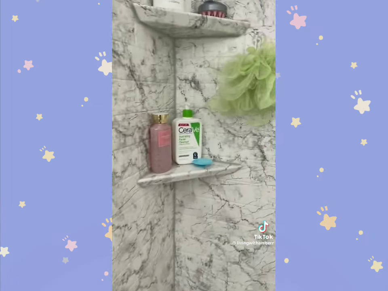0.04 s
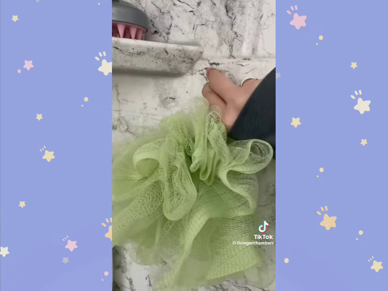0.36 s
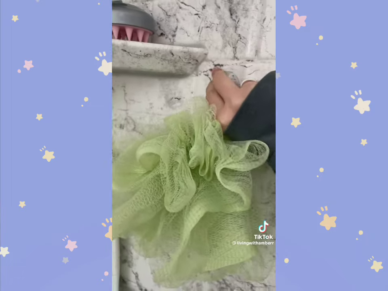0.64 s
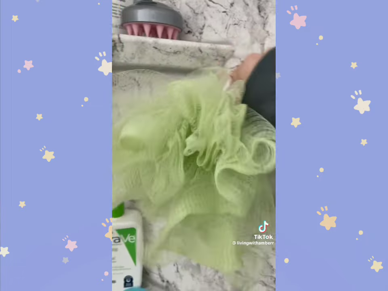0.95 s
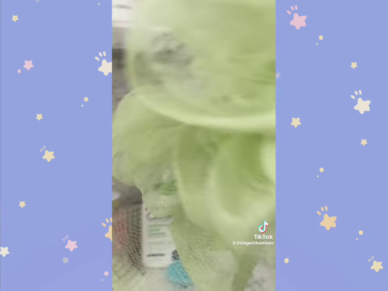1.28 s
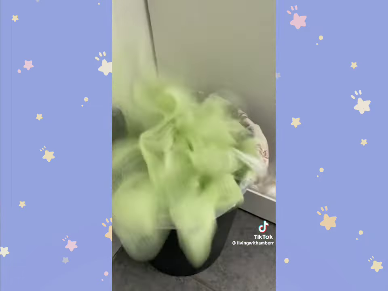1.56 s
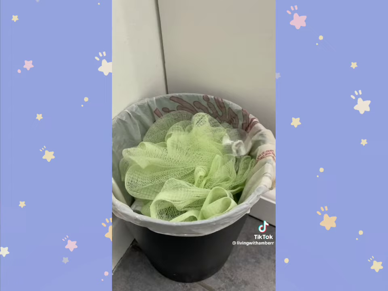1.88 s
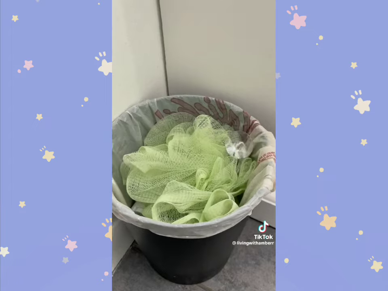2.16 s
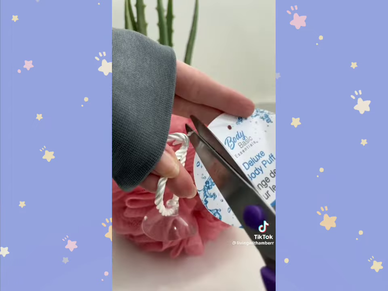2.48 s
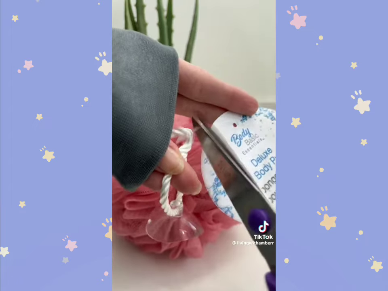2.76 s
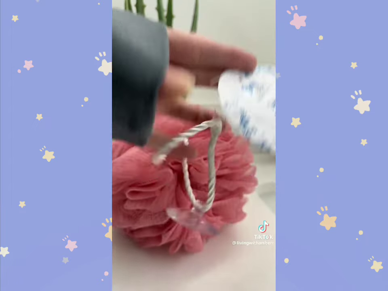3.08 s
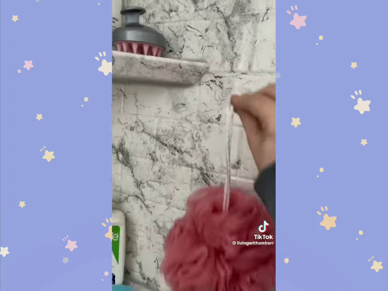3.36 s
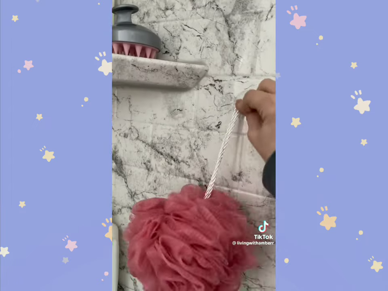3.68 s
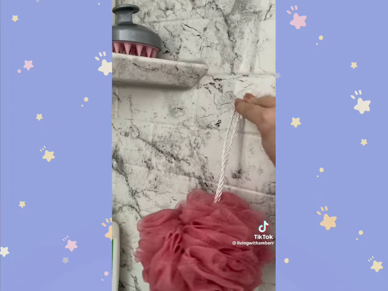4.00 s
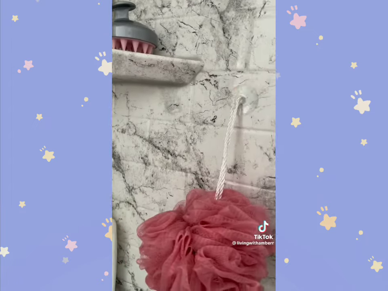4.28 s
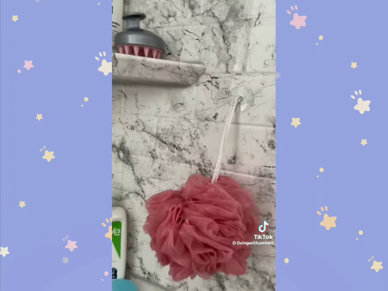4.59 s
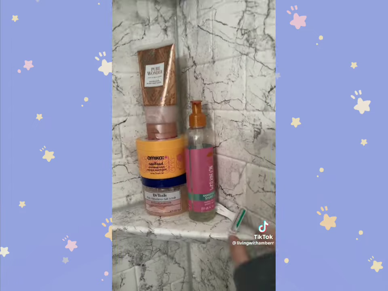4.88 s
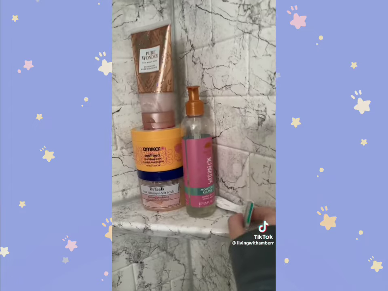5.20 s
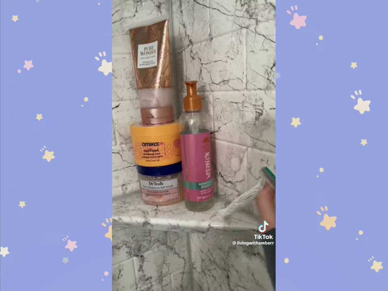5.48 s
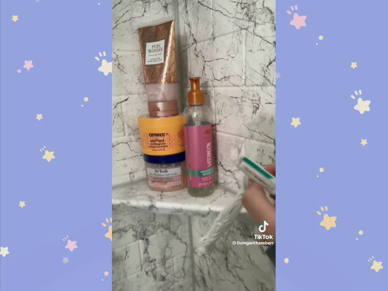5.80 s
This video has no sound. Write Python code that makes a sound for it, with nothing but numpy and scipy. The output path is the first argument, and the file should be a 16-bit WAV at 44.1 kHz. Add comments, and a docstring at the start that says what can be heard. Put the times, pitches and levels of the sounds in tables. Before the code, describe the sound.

Close bathroom handling: netting drops into a bin with a rustling thump, then a crisp scissor snip, hollow knocks and a light plastic scrape.

```python
"""Bath things are swapped close to a phone, over a low room rumble.
After a short hiss, a mesh sponge comes off its wall hook and drops into a lined bin (1.5 s), which
rustles and booms. Scissors crunch through the tag of a new one (2.8 s). Its cord is hung up with
knocks on the hollow wall panel (3.5 s); a brief tone swells into the first. Last, a razor taps a
shelf (5.1 s) and slides off, its handle ringing lower as it goes."""
import sys
import numpy as np
from scipy import signal
from scipy.fft import rfft, irfft, next_fast_len
from scipy.io import wavfile
from scipy.ndimage import uniform_filter1d

SR = 44100
rng = np.random.default_rng(int(sys.argv[2]) if len(sys.argv) > 2 else 0)


def log_audio(samples):
    """Write samples as a 16-bit WAV file to the path given in sys.argv[1]."""
    # one column per channel
    frames = np.atleast_2d(samples).T
    # limit to full scale, then quantise
    limited = np.clip(frames, -1, 1)
    pcm = np.round(limited * 32767).astype(np.int16)
    wavfile.write(sys.argv[1], SR, pcm)


N = 257544
TIME_S = np.arange(N) / SR
EDGE_HZ = 15700

# Sponge brushing the rim, sliding, landing, settling. Each row: start in seconds, hold in seconds,
# level in dB.
LINER_SLIDES = [(1.519, 0.05, -36), (1.576, 0.067, -24.5), (1.666, 0.032, -34.5), (1.751, 0.0079, -34),
                (1.77, 0.015, -39.5), (1.813, 0.025, -42.5), (1.919, 0.021, -59)]
# Netting on the liner. Each row: frequency in Hz, relative level in dB.
MESH_COLOUR = [(100, -8.5), (450, -7), (900, -16.5), (1400, -22.5), (1800, -16), (2900, -14.5),
               (4400, -14.5), (6000, -6), (7500, -7), (9000, -7), (11000, 1.5), (12300, -3.5),
               (13200, -9.5), (14000, -33.5), (15500, -46)]
# Narrow resonances of the lined bin. Each row: frequency in Hz, width in Hz, gain in dB.
BIN_RESONANCES = [(580.3, 35, 3), (1293, 61, 2), (1699, 36, -0.5), (2010, 70, 2), (2860, 130, -3.5),
                  (3700, 110, -0.5), (4320, 92, -1.5), (6590, 67, -2.5), (7200, 98, -1.5), (10750, 100, -7)]


def sponge_drop(boom_hz=170):
    """Netting slips down the liner; the rustle rings in the bin and the hollow booms along."""
    slide = sum(amp(db) * held(s, s + hold, 0.0087, 0.02) for s, hold, db in LINER_SLIDES)
    threads = grains(spread_db=-1, pan=0.53, per_band=14000) * slide
    rustle = colour(threads + amp(-7) * liner_folds(slide), tilted(MESH_COLOUR, 0.96))
    ringing = sum(amp(db) * signal.lfilter(*signal.iirpeak(hz, hz / width, fs=SR), rustle)
                  for hz, width, db in BIN_RESONANCES)
    hollow = amp(-13) * boom(boom_hz, width=0.19) * slide
    return placed(rustle + ringing + hollow, room_db=-4.5)


def liner_folds(slide, pops_per_s=340, decay_cycles=18, spread_db=6, pitches=24):
    """Small folds pop at random under the sliding sponge, each ringing briefly."""
    t, out = np.arange(SR // 30) / SR, np.zeros(N)
    for hz in np.geomspace(1100, 12000, pitches) * rng.uniform(0.95, 1.05, pitches):
        popped = rng.random(N) < pops_per_s / pitches / SR
        strength = amp(spread_db * np.minimum(rng.exponential(1, N), 3))
        ring = np.exp(-t * hz / decay_cycles) * np.sin(2 * np.pi * hz * t)
        out += signal.oaconvolve(unit(popped * strength) * slide, ring / np.linalg.norm(ring))[:N]
    return out / np.sqrt(pitches)


# Liner creases. Each row: start in seconds, decay in seconds, level in dB, pitch in Hz.
CRINKLES = [(1.5, 0.0012, -44.5, 1350), (1.5, 0.0018, -44, 2300), (1.519, 0.0025, -45, 1290),
            (1.574, 0.0023, -44.5, 1100), (1.577, 0.0012, -25.5, 6200), (1.638, 0.015, -22.5, 10750),
            (1.743, 0.0033, -46.5, 1800), (1.758, 0.0024, -39.5, 1900), (1.761, .001, -32, 7000),
            (1.766, 0.0013, -35.5, 4400), (1.779, 0.0029, -31, 11200), (1.982, 0.00078, -33, 6800)]


def liner_crinkles():
    """Larger creases give way one by one, each a short burst around one pitch."""
    t, out = np.arange(SR // 10) / SR, np.zeros(N)
    for s, decay, db, hz in CRINKLES:
        burst = resonant_noise(np.full(len(t), hz), width_hz=0.2 * hz)
        add(out, s, amp(db) * burst * pulse(t, decay))
    return placed(out, room_db=-15)


# Bin modes. Each row: frequency in Hz, level in dB, T60 in seconds.
BIN_MODES = [(180, -15.5, 0.11), (343, -21, 0.1), (629, 4, 0.028), (960, -10.5, .04), (1290, -4.5, .05),
             (1640, -0.5, .04), (1920, 2, .04)]
# Sponge landing. Each row: start in seconds, level in dB, contact time in seconds.
BIN_BLOWS = [(1.7712, -4.5, 0.00048)]


def bin_landing(peak_s=1.7696, lead_s=0.0041, end_hz=573, sweep_hz=4976, fall_s=0.0034):
    """The thin bin wall rings and bends; short waves arrive first, so the thump swoops down."""
    t, chirp = np.arange(SR // 20) / SR, np.zeros(N)
    pitch = end_hz + sweep_hz * np.exp(-(t / fall_s) ** 2)
    add(chirp, peak_s - lead_s, np.sin(phase(pitch)))
    flex = amp(-11) * chirp * held(peak_s, peak_s, 0.00037, 0.0017)
    return struck(BIN_MODES, BIN_BLOWS, room_db=-16) + placed(flex, room_db=-13.5)


# Short bright hisses. Each row: peak in seconds, length in seconds, level in dB.
BRIGHT_HISSES = [(0.258, 0.04, -59), (0.613, 0.032, -59.5), (0.79, 0.058, -50), (0.936, 0.036, -51),
                 (0.97, 0.05, -64.5), (1.078, 0.066, -59.5), (1.379, 0.015, -55), (1.421, 0.032, -53.5),
                 (2.693, .014, -58.5), (2.825, 0.053, -42), (2.985, 0.03, -43.5), (3.158, 0.05, -61),
                 (3.199, 0.0084, -40.5), (3.471, 0.031, -40), (3.969, 0.038, -58), (4.9, 0.074, -69.5),
                 (5.107, 0.098, -66), (5.34, 0.14, -58.5)]
# Steady scratching of netting and sleeve. Each row: start in seconds, end in seconds, level in dB.
GRIPS = [(0.226, 0.636, -73), (0.51, 0.532, -73), (1.056, 1.149, -66), (4.304, 4.368, -79.5),
         (4.62, 4.658, -82), (4.854, 5.02, -76)]
# Bright hiss and scratch spectra. Each row: frequency in Hz, relative level in dB.
BRIGHT_COLOUR = [(100, -0.5), (400, -2), (900, -13), (1800, -9), (3200, -10.5), (4700, -14.5), (6500, -2),
                 (9000, -8.5), (11200, 2.5), (12300, -8), (13500, -29)]
GRIP_COLOUR = [(300, 1), (1000, -14), (2000, -3), (3800, -2.5), (6500, 1.5), (9000, 3.5), (11200, -1),
               (13500, -26)]


def hisses_and_scratches():
    """Light mesh brushes, fizz around the snip, click and knock, and faint scratching of the grip."""
    swells = sum(swell(*row, lead=0.49) for row in BRIGHT_HISSES)
    hiss = colour(grains(spread_db=1, per_band=14000) * swells, BRIGHT_COLOUR)
    grip = sum(amp(db) * held(start, end, 0.005, 0.005) for start, end, db in GRIPS)
    scratch = colour(grains(spread_db=-1.5, per_band=5000) * grip, GRIP_COLOUR)
    return placed(hiss + scratch, room_db=-12)


# Scissor snaps. Each row: start in seconds, level in dB, decay in seconds.
SNAPS = [(2.7926, -19, .0004), (2.801, -14, 0.0007), (2.8026, -12.5, 0.00066), (3.1979, -26, 0.0008),
         (3.2072, -40, .0005), (3.2132, -39, 0.0006)]
# Crunch and snap spectra. Each row: frequency in Hz, relative level in dB.
CUT_COLOUR = [(200, -3), (800, -12.5), (1400, -17), (3000, -11), (4300, -20.5), (5600, -7), (7600, 2.5),
              (9000, 2.5), (11200, 4.5), (12500, -10.5), (13500, -25.5), (15500, -21)]
SNAP_COLOUR = [(200, -8), (900, -12), (2000, -6.5), (3800, -9), (4700, -17), (5800, -0.5), (7400, 0),
               (9000, -2.5), (11200, 4), (12500, -10.5), (13500, -19.5), (15500, -14)]
# Tag and blade modes. Each row: frequency in Hz, level in dB, T60 in seconds.
TAG_MODES = [(100, -2.5, 0.023), (202.6, -1.5, 0.026), (488, -9, 0.029)]
BLADE_MODES = [(6560, -2.5, .12), (7400, -0.5, .05), (8890, -2, .12), (8750, -2, .09), (9970, -1, .12),
               (10600, 4.5, 0.094), (11120, -0.5, .13), (12260, -2.5, 0.13)]
# Blows at the cut. Each row: start in seconds, level in dB, contact time in seconds.
TAG_BLOWS = [(2.8046, -10.5, 0.00012)]
BLADE_BLOWS = [(2.8025, -43, 0.0000099)]


def scissors(bite_s=2.788, cut_s=2.805, cut_db=-17.5, squeeze_db_per_s=399.5):
    """Fibres crunch ever louder until the blades snap through and ring; later they click again."""
    bite = held(bite_s, cut_s, 0.006, 0.0061)
    squeeze = amp(cut_db + squeeze_db_per_s * np.minimum(TIME_S - cut_s, 0))
    crunch = grains(spread_db=-4, per_band=20000) * bite * squeeze
    t, snaps = np.arange(SR // 50) / SR, np.zeros(N)
    for s, db, decay in SNAPS:
        add(snaps, s, amp(db) * pulse(t, decay) * rng.choice([-1, 1], len(t)))
    return (placed(colour(crunch, CUT_COLOUR), room_db=-15)
            + placed(colour(snaps, SNAP_COLOUR), room_db=-26.5)
            + struck(TAG_MODES, TAG_BLOWS, room_db=-32)
            + struck(BLADE_MODES, BLADE_BLOWS, room_db=-18))


# Wall panel modes. Each row: frequency in Hz, level in dB, T60 in seconds.
WALL_MODES = [(83.1, -24.5, 0.323), (140, -31, 0.15), (169.5, -16.5, 0.2), (230.7, -21.5, 0.22),
              (311.3, -10, 0.1), (427, -10, 0.071), (566, -17, 0.21), (591, -8, 0.072), (712, -14.5, 0.073),
              (943, -22.5, 0.11), (1000, 15, 0.0052), (1212, -16, 0.078), (1440, 7.5, 0.01),
              (1427, -11.5, 0.088), (1529, -28, 0.062), (2690, -13, 0.0071), (5760, -10.5, 0.006)]
# Knocks on the panel. Each row: start in seconds, level in dB, contact time in seconds.
WALL_BLOWS = [(3.4697, -12.5, 0.000018), (3.4757, -25.5, 0.0003), (3.483, -22.5, 0.00032),
              (3.876, -15, 0.00047), (3.9754, -14.5, 0.00037), (3.988, -18.5, 0.0004),
              (4.002, -16, 0.00056), (4.121, -38, 0.00012)]


def wall_knocks():
    """The hollow panel rings as the cord is hung up."""
    return struck(WALL_MODES, WALL_BLOWS, room_db=-7)


def tone_before_knock(start_s=3.46, hold_s=0.014, hz=1450, jitter=0.049, level_db=-27.5):
    """A brief, nearly pure tone swells into the first knock."""
    envelope = held(start_s, start_s + hold_s, 0.0038, 0.0032)
    pitch = hz * (1 + jitter * wobble(samples=200))
    return placed(amp(level_db) * unit(np.sin(phase(pitch))) * envelope, room_db=-15.5)


# Modes of the ringing taps. Each row: frequency in Hz, level in dB, T60 in seconds.
RINGING_TAP_MODES = [(344, 13, 0.056), (450, -2, 0.04), (833, 13.5, 0.025), (1202, -2.5, 0.0596),
                     (1440, -5, 0.07), (1648, 12.5, 0.023), (1900, 6, 0.034), (2164, 5, 0.031),
                     (2750, -4, 0.04), (3150, 9, 0.018), (4080, -1, 0.021)]
# Blows of hook and razor. Each row: start in seconds, level in dB, contact time in seconds.
RINGING_TAP_BLOWS = [(0.749, -43, 0.00023), (5.125, -46, 0.000036), (5.1897, -50.5, 0.000043),
                     (5.1951, -40.5, 0.00047)]


def ringing_taps():
    """Light ringing taps: first the wall hook, later the razor on the shelf."""
    return struck(RINGING_TAP_MODES, RINGING_TAP_BLOWS, room_db=-6.5)


# Glide of the razor handle. Each row: time in seconds, pitch in Hz, level in dB.
HANDLE_GLIDE = [(5.26, 1854, -56), (5.32, 1680, -49), (5.41, 1519, -51), (5.45, 1242, -50),
                (5.49, 1000, -56.5)]
# Handle modes. Each row: multiple of the pitch, width in Hz, level in dB.
HANDLE_MODES = [(0.521, 400, -4.5), (0.999, 131, -5), (1.4, 250, -16), (2.001, 403, -16.5)]


def razor_handle(ease_s=0.0095, catch_db=2):
    """The sliding handle rings in uneven catches, lower as more of it hangs over the edge."""
    s, hz, db = np.transpose(HANDLE_GLIDE)
    pitch = np.interp(TIME_S, s, hz)
    force = amp(np.interp(TIME_S, s, db)) * held(s[0], s[-1], ease_s, ease_s)
    catches = amp(catch_db * wobble(samples=250))
    ring = sum(amp(mode_db) * resonant_noise(pitch * ratio, width)
               for ratio, width, mode_db in HANDLE_MODES)
    return placed(ring * force * catches, room_db=-11.5)


# Cord, fingers and razor rubbing. Each row: peak in seconds, length in seconds, level in dB.
RUBS = [(0.814, 0.12, -50.5), (2.293, 0.029, -54.5), (2.527, 0.18, -69), (2.698, 0.011, -56),
        (3.616, 0.088, -63.5), (3.684, 0.02, -64.5), (3.978, 0.03, -42), (4.177, 0.022, -60),
        (4.233, 0.028, -71), (4.357, 0.13, -67), (5.15, 0.037, -51), (5.56, 0.027, -54)]
# Rub spectrum. Each row: frequency in Hz, relative level in dB.
RUB_COLOUR = [(100, 4), (400, 7.5), (850, -2.5), (1500, -6.5), (2200, -7.5), (4000, -22.5), (7000, -18),
              (11000, -21.5), (13000, -44)]


def rubs(drag_from_s=5.305, drag_to_s=5.48, drag_db=-52):
    """Fine stick and slip on hard surfaces, and the razor's long drag off the shelf."""
    slips = grains(spread_db=-0.5)
    strokes = colour(slips * sum(swell(*row, lead=0.7) for row in RUBS), RUB_COLOUR)
    pull = amp(drag_db) * held(drag_from_s, drag_to_s, 0.05, 0.0049)
    drag = colour(slips * pull, tilted(RUB_COLOUR, 1.5))
    return placed(strokes, room_db=-6) + placed(drag, room_db=-2.5)


# Hollow scrapes. Each row: peak in seconds, length in seconds, level in dB, pitch in Hz.
SCRAPES = [(0.802, 0.095, -45.5, 524), (0.858, 0.027, -49, 1010), (1.275, 0.26, -76, 1013),
           (2.535, 0.11, -72.5, 1404), (2.852, 0.01, -47, 1360), (3.991, 0.0325, -37, 605.6),
           (5.324, 0.068, -47, 705), (5.452, 0.026, -40.5, 1079)]


def plastic_scrapes(sag_octaves_per_s=4):
    """Friction noise in one resonance that sinks as the contact slows."""
    out = np.zeros(N)
    for s, length, db, hz in SCRAPES:
        pitch = hz * 2 ** np.clip(-sag_octaves_per_s * (TIME_S - s), -0.2, 0.2)
        out += resonant_noise(pitch, width_hz=0.38 * hz) * swell(s, length, db, lead=0.46)
    return placed(out, room_db=-7)


# Ticks and taps. Each row: start in seconds, level in dB, tilt in dB per octave.
TICKS = [(.249, -62, -1), (.624, -68, -1.5), (1.0739, -53.5, 0.5), (1.501, -47, 3.5), (1.944, -55.5, 8),
         (1.9495, -60.5, -0.5), (1.982, -53.5, 5), (2.055, -70, -2), (2.119, -65.5, 4), (2.147, -67, 17),
         (2.970, -64, -1.5), (2.978, -58, -0.5), (3.033, -58, -1.5), (3.118, -62.5, -1.5), (3.931, -78, 2),
         (5.069, -67, 0)]
TAPS = [(.693, -62.5, 1.5), (.7463, -45.5, 4.5), (.7943, -51.5, 3), (.8148, -45, -1.5), (2.2842, -57, 3.5),
        (2.3455, -57, 1), (2.6895, -58, 3), (2.7005, -60, 5), (3.4638, -40, 3.5), (3.4696, -33.5, 2.5),
        (3.874, -64, 10), (4.1215, -50, -0.5), (5.126, -59.5, 6), (5.19, -61.5, 1.5)]
# Their spectra. Each row: frequency in Hz, relative level in dB.
TICK_COLOUR = [(100, 0), (400, 5), (1100, -7.5), (3500, -3), (7000, 0), (11000, 5), (12500, -7.5),
               (14000, -26)]
TAP_COLOUR = [(40, -14.5), (250, 7), (1100, -4), (2200, -15.5), (4800, -25), (11000, -33), (13200, -45),
              (14500, -68)]


def small_contacts():
    """Threads and film flick free with bright ticks; hard plastic taps lightly."""
    return (clicks(TICKS, TICK_COLOUR, decay_s=0.0014, room_db=-8)
            + clicks(TAPS, TAP_COLOUR, decay_s=0.0043, room_db=-6.5))


# Handling bumps. Each row: peak in seconds, length in seconds, level in dB, pitch in Hz.
BUMPS = [(0.619, 0.042, -35, 139), (0.761, 0.1, -43, 129), (0.833, 0.035, -43, 259),
         (1.076, 0.024, -53, 119.4), (1.443, 0.15, -40.5, 80), (1.571, 0.013, -30, 169),
         (1.827, 0.017, -31.5, 183), (2.021, 0.11, -43.5, 111.3), (2.281, 0.02, -44.5, 430),
         (3.519, 0.2, -38.5, 32.65), (3.727, 0.039, -49.5, 342), (3.998, 0.13, -39, 140)]


def bumps():
    """Soft things push on hollow things, each a low boom."""
    return ports(sum(boom(hz, width=0.28) * swell(s, length, db, lead=0.11)
                     for s, length, db, hz in BUMPS))


# Spurts of hiss. Each row: peak in seconds, length in seconds, level in dB.
HISS_SPURTS = [(0.011, 0.053, -23.5), (0.128, 0.0048, -29)]
# Hiss spectrum. Each row: frequency in Hz, relative level in dB.
HISS_COLOUR = [(40, -10.5), (200, 1.5), (600, -4), (1100, -4), (1900, -7), (2800, 0), (4000, -7.5),
               (5600, -5), (8000, -4.5), (10500, -1), (12000, -0.5), (13500, -32.5)]


def opening_hiss(stop_s=0.1356, shut_s=0.0025):
    """A broad hiss starts at once, fades, spurts again and is shut off."""
    flow = sum(swell(*row, lead=0.18) for row in HISS_SPURTS) * held(0, stop_s, shut_s, shut_s)
    return placed(colour(grains(spread_db=2, per_band=30000) * flow, HISS_COLOUR), room_db=-37.5)


# Rumble and hum spectra. Each row: frequency in Hz, relative level in dB.
RUMBLE_COLOUR = [(12, -40.5), (20, -12), (80, -2), (171, -8.5), (196, -17.5), (238, -11.5), (282, -21),
                 (382, -17.5), (811, -38), (1100, -42), (2540, -48), (9000, -53), (11100, -46),
                 (15500, -77)]
HUM_COLOUR = [(80, -12), (200, 8), (280, -9), (370, 8), (480, -8), (700, -25), (1500, -24), (3000, -40)]
# Diffuse sound. Each row: frequency in Hz, left-right likeness from 0 to 1.
LIKENESS = [(40, .985), (150, .93), (300, .85), (700, .65), (2000, .35), (12000, .35)]


def background(rumble_db=-51, hum_db=-56, waver_db=0.5, waver_s=0.12, ease_s=0.0062):
    """Wavering rumble and faint hiss yield to a soft hum around the cut; all dip briefly after it."""
    size = next_fast_len(N)
    hz = np.fft.rfftfreq(size, 1 / SR)
    left, apart, slow = rfft(rng.standard_normal((3, size)))
    same = np.clip(read(LIKENESS, hz), 0, 1)
    right = same * left + np.sqrt(1 - same ** 2) * apart
    noise = irfft(np.array([left, right]) * amp(read(RUMBLE_COLOUR, hz)), size)[:, :N]
    waver = unit(irfft(slow * np.exp(-(hz * waver_s) ** 2), size)[:N])
    humming = held(2.2, 3.24, ease_s, ease_s)
    calm_db = -5 * humming - 1.5 * held(3.3, N / SR, waver_s, waver_s)
    dip_db = -14.5 * held(2.825, 2.925, ease_s, ease_s)
    hum = ports(colour(rng.standard_normal(N), HUM_COLOUR) * amp(hum_db) * humming)
    rumble = unit(noise) * amp(rumble_db + waver_db * waver + calm_db)
    return (rumble + hum) * amp(dip_db)


# Room decay. Each row: frequency in Hz, T60 in seconds.
ROOM_T60 = [(100, 0.94), (400, 0.26), (1500, 0.51), (5000, 0.19), (12000, 0.14)]


def echoes(x, first_s=0.0033, early_s=0.037, early_gain=13):
    """Hard nearby walls: dense early reflections, then a tail that dies faster in the treble."""
    t = np.arange(SR // 2) / SR
    taps = rng.standard_normal((2, len(t))) * (t > first_s) * (1 + early_gain * np.exp(-t / early_s))
    hz, s, bands = signal.stft(taps, SR, nperseg=256)
    same = np.clip(read(LIKENESS, hz), 0, 1)[:, None] ** 2
    bands[1] = same * bands[0] + np.sqrt(1 - same ** 2) * bands[1]
    decay = amp(-60 * s / read(ROOM_T60, hz)[:, None])
    tail = signal.istft(bands * decay, SR, nperseg=256)[1]
    return signal.oaconvolve(x[None], tail / np.linalg.norm(tail[0]), axes=1)[:, :N]


# Lag between microphone ports. Each row: frequency in Hz, left lead in radians.
PORT_PHASE = [(100, 0), (550, -.7), (1100, -.4), (2000, .3), (4500, .5), (7200, 1.4), (8400, 1.9),
              (9200, 3.2), (10500, 4.7), (12500, 5.6)]
# Port balance. Each row: frequency in Hz, left minus right in dB.
PORT_BALANCE = [(100, -0.74), (500, 0), (1000, -5.5), (2000, -0.05), (10000, 0)]


def ports(x):
    """Direct sound reaches the two microphone ports slightly out of step and unequal."""
    size = next_fast_len(N + SR // 10)
    hz = np.fft.rfftfreq(size, 1 / SR)
    turn = np.exp(0.5j * read(PORT_PHASE, hz))
    lean = amp(read(PORT_BALANCE, hz) / 2)
    return irfft(rfft(x, size) * np.array([turn * lean, turn.conj() / lean]), size)[:, :N]


def placed(x, room_db, bounce_s=0.0011, bounce_db=-6, bounce_hz=(650, 2800)):
    """Direct sound, a bounce off the nearest surface that widens the midrange, and echoes."""
    mono, bounce = np.atleast_2d(x).mean(0), np.zeros(N)
    add(bounce, bounce_s, signal.lfilter(*signal.butter(1, bounce_hz, "bandpass", fs=SR), mono))
    return ports(x) + amp(bounce_db) * np.array([bounce, -bounce]) + amp(room_db) * echoes(mono)


def struck(modes, blows, room_db, build_cycles=0.43):
    """Blows ring an object's modes; a longer contact gives a duller knock."""
    t, ring, out = np.arange(SR // 2) / SR, 0, np.zeros(N)
    for k, (hz, db, t60) in enumerate(modes):
        envelope = amp(db - 60 * t / t60) * (1 - np.exp(-t * hz / build_cycles))
        ring += (-1) ** k * envelope * np.sin(2 * np.pi * hz * t)
    for s, db, contact in blows:
        push = t * np.exp(-t / contact)
        add(out, s, amp(db) * signal.fftconvolve(ring, push / push.sum())[:len(t)])
    return placed(out, room_db)


def clicks(rows, spectrum, decay_s, room_db, chatter=0.69):
    """Each contact is an impulse and a few ms of chatter; harder ones tilt towards the treble."""
    t, out = np.arange(SR // 12) / SR, np.zeros(N)
    for s, db, tilt in rows:
        force = (t == 0) + chatter * np.exp(-t / decay_s) * rng.standard_normal(len(t))
        add(out, s, amp(db) * unit(colour(force, tilted(spectrum, tilt))))
    return placed(out, room_db)


def grains(spread_db, pan=0.057, per_band=9000, bands=10):
    """Tiny impulses at random moments, each with its own band, strength and side."""
    size = next_fast_len(N)
    hz, spectrum = np.fft.rfftfreq(size, 1 / SR), 0
    centres = np.linspace(0, EDGE_HZ, bands)
    for centre in centres:
        at = rng.integers(0, N, per_band)
        side = pan * (centre > 0) * rng.standard_normal(per_band)  # bass stays central
        height = amp(spread_db * np.minimum(rng.exponential(1, per_band), 4))
        height *= rng.choice([-1, 1], per_band)
        height *= amp(2.5 * rng.standard_normal(N // 500 + 1))[at // 500]  # colour shifts every 11 ms
        trains = np.array([np.bincount(at, height * (1 + sign * side), size) for sign in (1, -1)])
        band = np.cos(np.pi / 2 * np.clip((hz - centre) / centres[1], -1, 1))
        spectrum += rfft(trains) * band
    return unit(irfft(spectrum, size)[:, :N])


def boom(hz, width):
    """Noise around one pitch; width is a share of it."""
    band = signal.butter(2, [hz / (1 + width), hz * (1 + width)], "bandpass", fs=SR, output="sos")
    return unit(signal.sosfilt(band, rng.standard_normal(N)))


def resonant_noise(hz, width_hz):
    """Noise in a resonance that follows a pitch curve."""
    flutter = signal.lfilter(*signal.butter(2, width_hz / 2, fs=SR), rng.standard_normal((2, len(hz))))
    angle = phase(hz)
    return unit(flutter[0] * np.cos(angle) + flutter[1] * np.sin(angle))


def colour(x, spectrum, size=2048):
    """Causal filter of unit energy with the given spectrum."""
    log_gain = np.log(amp(read(spectrum, abs(np.fft.fftfreq(size, 1 / SR)))))
    taps = np.fft.ifft(np.exp(np.conj(signal.hilbert(log_gain)))).real[:size // 2]
    taps = np.array(taps / np.linalg.norm(taps), ndmin=x.ndim)
    return signal.oaconvolve(x, taps, axes=-1)[..., :x.shape[-1]]


def tilted(spectrum, db_per_octave):
    """Leans a spectrum."""
    return [(hz, db + db_per_octave * np.log2(hz)) for hz, db in spectrum]


def held(start_s, end_s, attack_s, release_s):
    """Gain that grows until the start, holds until the end and dies away."""
    outside = np.maximum((start_s - TIME_S) / attack_s, (TIME_S - end_s) / release_s)
    return np.exp(-np.maximum(outside, 0))


def swell(peak_s, length_s, db, lead):
    """Gain of one stroke; lead is the share of its length spent growing."""
    return amp(db) * held(peak_s, peak_s, lead * length_s, (1 - lead) * length_s)


def pulse(t, decay_s):
    """Gain that rises to one and decays."""
    return t / decay_s * np.exp(1 - t / decay_s)


def wobble(samples):
    """Smoothed noise of unit rms."""
    return unit(uniform_filter1d(rng.standard_normal(N), size=samples))


def phase(hz):
    """Pitch curve to radians."""
    return 2 * np.pi * np.cumsum(hz) / SR


def add(mix, start_s, sound):
    """Mixes a sound in at a time."""
    part = mix[..., max(round(start_s * SR), 0):][..., :sound.shape[-1]]
    part += sound[..., :part.shape[-1]]


def read(points, hz):
    """Reads a table on a log-frequency axis."""
    points_hz, values = np.transpose(points)
    return np.interp(np.log(hz + 1), np.log(points_hz + 1), values)


def amp(db):
    """Decibels to gain."""
    return 10 ** (np.asarray(db) / 20)


def unit(x):
    """Scales to an rms of one."""
    return x / np.sqrt(np.mean(x ** 2) + 1e-20)


def scene():
    """Sponge, scissors, wall and razor, with small noises and the room."""
    sponge = sponge_drop() + liner_crinkles() + bin_landing()
    fizz = hisses_and_scratches()
    wall = wall_knocks() + tone_before_knock()
    ringing = ringing_taps() + razor_handle()
    handling = rubs() + plastic_scrapes() + small_contacts() + bumps()
    return sponge + scissors() + wall + ringing + handling + fizz + opening_hiss() + background()


def record(dry):
    """The microphone dulls the highest treble and limits the band."""
    hz = np.linspace(0, SR / 2, 257)
    rolloff_db = read([(11500, 0), (13500, -5), (15000, -13)], hz)
    response = signal.firwin2(255, hz, amp(rolloff_db), fs=SR)
    edge = signal.firwin(511, EDGE_HZ, window=("kaiser", 9), fs=SR)
    return signal.oaconvolve(dry, np.convolve(response, edge)[None], "same")


dry = scene()
out = record(dry)
log_audio(out)
```